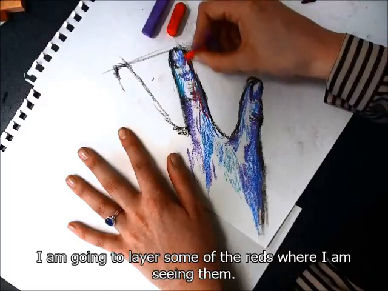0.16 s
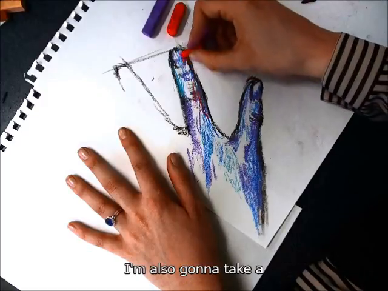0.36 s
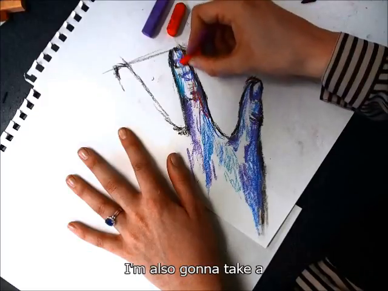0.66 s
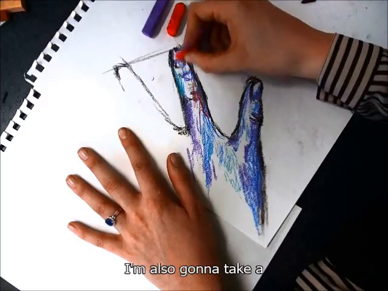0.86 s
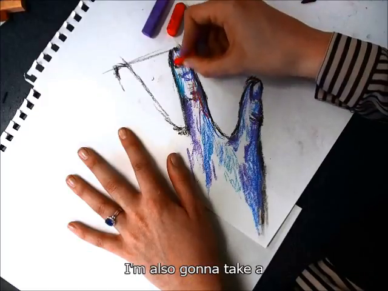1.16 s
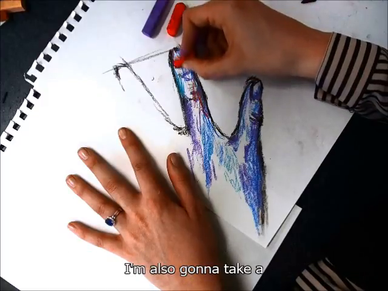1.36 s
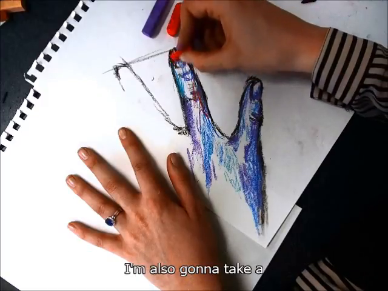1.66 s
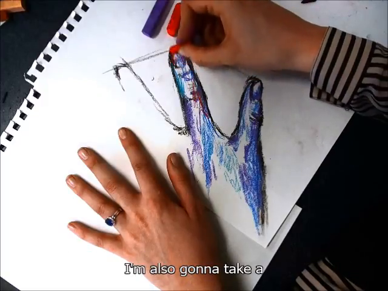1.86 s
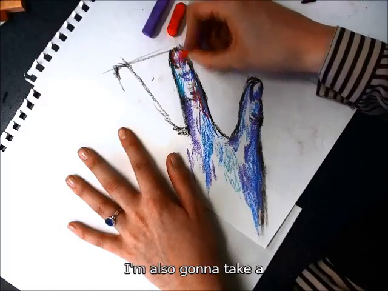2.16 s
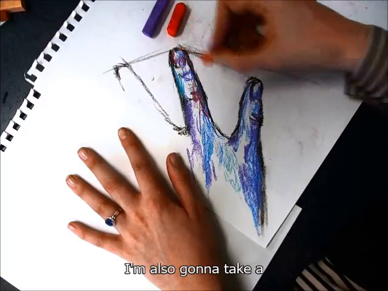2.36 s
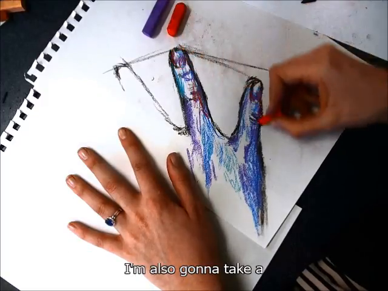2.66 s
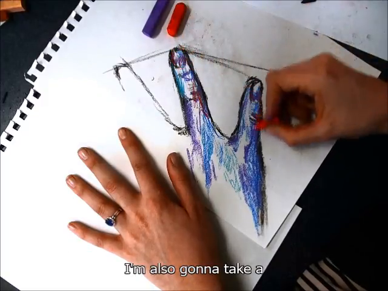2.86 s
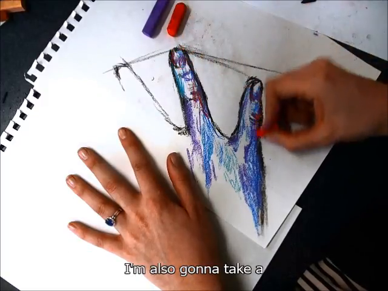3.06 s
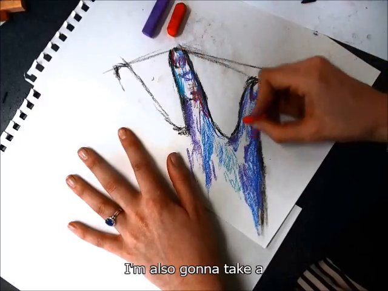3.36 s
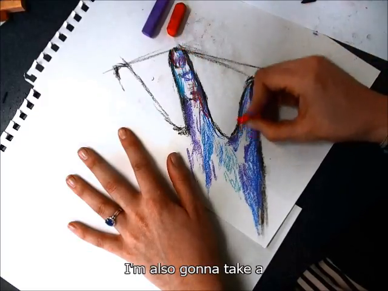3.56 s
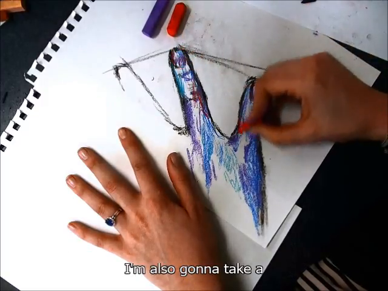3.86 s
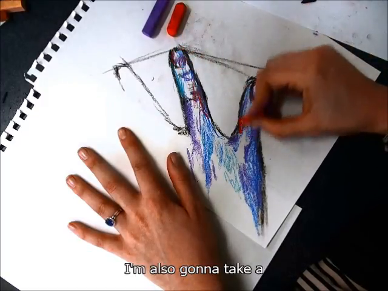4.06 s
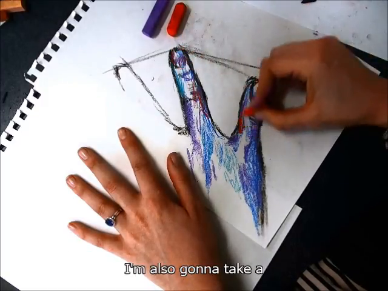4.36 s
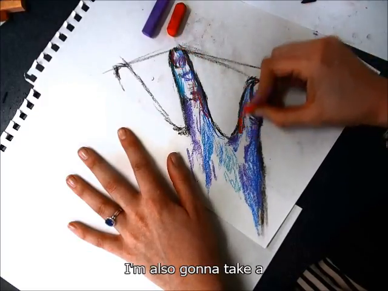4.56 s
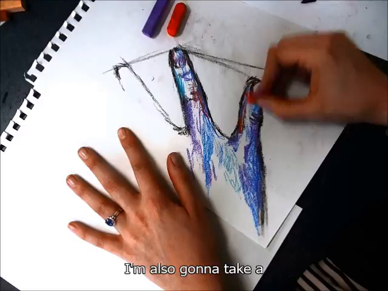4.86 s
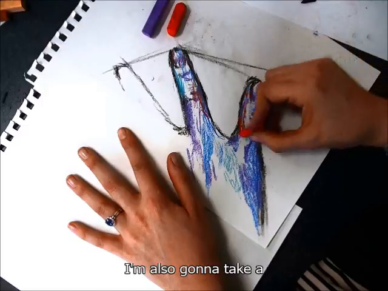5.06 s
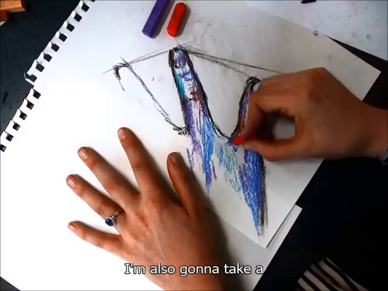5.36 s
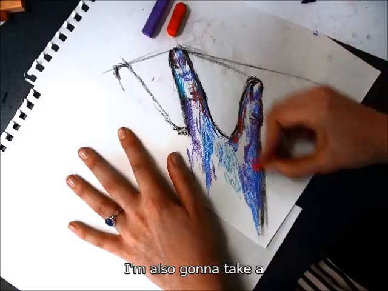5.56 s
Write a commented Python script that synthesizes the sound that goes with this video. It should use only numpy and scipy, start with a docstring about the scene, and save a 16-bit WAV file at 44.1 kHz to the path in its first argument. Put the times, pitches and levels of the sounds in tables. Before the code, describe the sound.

A quiet, dry room carries a faint rush of air and a wavering computer-fan hum throughout, with a barely audible low wobble from the rocking microphone stand. A soft bump comes at 0.1 s, and a pastel stick shades paper in short, thin, powdery scratches, roughly five or six a second, until 2.2 s, with a few tiny snaps and muffled taps near 1.9 and 2.1 s. A brisker, louder flick at 2.3 s is followed by a pause. From 3.0 s the stick scrapes and drags, crumbling in sparse crackle and sharp little snaps; a deep soft hand bump lands at 3.5 s and crisp table taps at 3.7 and 3.9 s. Fast strokes, about ten a second, with duller, grainier crackle run to about 5.1 s. A faint slow drag follows, then from 5.4 s stronger drags, snaps and low bumps to the end at about 5.7 s. Close microphone, narrow treble.

```python
"""A computer fan hums in a quiet room and the microphone sways on its stand, from start to end.
A pastel stick shades a first patch in short strokes: filtered noise that swells and fades with each stroke.
Then it drags and crumbles in sparse crackle and short snaps, while taps ring the table and the hand bumps it.
It shades a second patch, duller crackle under the strokes, and ends with more drags, snaps and soft bumps."""
import sys
import numpy as np
from scipy import signal
from scipy.fft import rfft, irfft
from scipy.io import wavfile

SR = 44100
rng = np.random.default_rng(int(sys.argv[2]) if len(sys.argv) > 2 else 0)


def dump_mix(stems):
    """Bounce the given channels to the path in sys.argv[1] as a 16-bit WAV at rate SR."""
    frames = np.atleast_2d(stems).T  # one column per channel
    limited = np.clip(frames, -1, 1)  # hard clip at full scale
    pcm = np.round(limited * 32767).astype(np.int16)
    wavfile.write(sys.argv[1], SR, pcm)


N = 252428
TIME = np.arange(N) / SR  # s

# shading strokes of the stick: start t/s, length t/s, level at the fastest moment/dB
STROKES = [(0.13, 0.11, -62.5), (.245, 0.052, -64.5), (0.478, .075, -62), (0.662, .072, -58),
           (0.842, .078, -56.5), (1.015, .075, -62), (1.198, 0.06, -63.5), (1.35, .08, -61),
           (1.535, 0.066, -58.5), (1.70, 0.086, -58.5), (1.92, .08, -60), (2.095, 0.082, -63.5),
           (2.2, .1, -64), (2.285, 0.057, -51.5), (3.088, .095, -57.5), (3.29, 0.054, -56.5),
           (3.68, 0.092, -58), (3.795, 0.06, -61), (3.878, 0.08, -56.5), (3.968, 0.083, -58),
           (4.057, .086, -56.5), (4.156, 0.084, -57), (4.243, 0.087, -54), (4.354, .07, -56.5),
           (4.433, 0.068, -53.5), (4.56, 0.031, -57), (4.605, 0.059, -53.5), (4.712, 0.039, -56),
           (4.768, 0.068, -55.5), (4.915, 0.044, -56), (5.042, .045, -58)]
# slow drags between the runs of shading: start t/s, length t/s, level at the fastest moment/dB
DRAGS = [(-.2, 0.5, -67.5), (3.17, 0.14, -57.5), (3.328, 0.039, -54), (3.372, .036, -53.5),
         (3.47, 0.075, -57), (3.59, 0.16, -60.5), (5.09, .26, -67), (5.36, .1, -54.5),
         (5.497, 0.069, -51.5), (5.69, .06, -52)]


def gain_of(db):
    """Turns decibels into amplitude."""
    return 10 ** (np.asarray(db) / 20)


def evened(x):
    """Scales a sound to an average strength (rms) of 1."""
    return x / np.sqrt(np.mean(x ** 2) + 1e-20)


def level(curve):
    """Amplitude over time, drawn through rows of t/s, level/dB."""
    return gain_of(np.interp(TIME, *np.transpose(curve)))


def add(mix, s, sound):
    """Mixes a sound in at s seconds, or at the very start if s is negative."""
    part = mix[max(round(s * SR), 0):][:len(sound)]
    part += sound[:len(part)]


def coloured(x, points):
    """Filters a sound by a spectrum with rows of f/Hz, level/dB, then evens it to rms 1."""
    hz, db = np.transpose(points)
    f = np.fft.rfftfreq(N, 1 / SR)
    shape = gain_of(np.interp(np.log(f + 1), np.log(hz), db))
    low_fade = np.minimum(f / hz[0], 1)  # fades out below the lowest point
    return evened(irfft(rfft(x) * shape * low_fade, N))


def drift(rate):
    """Smooth random wandering, changing up to about rate times a second; rms 1."""
    f = np.fft.rfftfreq(N, 1 / SR)
    keep_slow = np.exp(-(f / rate) ** 2) * (f > 0)
    return evened(irfft(rfft(rng.standard_normal(N)) * keep_slow, N))


def glides(rows, fullness):
    """Level of hand movements that each speed up and slow down in the same arch."""
    fastest_at = 0.53  # share of the movement
    out = np.zeros(N)
    for start, length, db in rows:
        progress = np.interp((TIME - start) / length, [0, fastest_at, 1], [0, .5, 1])
        out += gain_of(db) * abs(np.sin(np.pi * progress)) ** fullness
    return out


def air():
    """The steady rush of the fan and rumble of the room are noise with one fixed colour."""
    # spectrum of the room: f/Hz, level per Hz/dB
    room_colour = [(15, 26), (30, 18), (48, 11.5), (85, 10), (130, 3.5), (330, 0.5), (420, -1), (700, 1),
                   (850, -3.5), (1150, -2.5), (1600, -9.5), (2800, -12), (4500, -14), (7600, -18)]
    room_db = -51.5
    return gain_of(room_db) * coloured(rng.standard_normal(N), room_colour)


def hum(swelling_hz=740, swelling_width_hz=30):
    """Close fan tones beat against each other over a weak mains hum; the fan speed wanders a little."""
    # mains hum: f/Hz, level/dB
    mains = (60, -64)
    # fan tones: f/Hz, level before the swell/dB
    fan_tones = [(207.3, -74), (359.3, -77.5), (530.3, -68.5), (585.4, -77.5), (608.3, -74), (612.4, -76.5),
                 (675.6, -82), (705.2, -71.5), (716.7, -75.5), (727.4, -63.5), (750.3, -69), (757.7, -67),
                 (818.3, -84), (847.2, -77), (944.1, -77.5), (1049.7, -78), (1063.2, -70), (1067.9, -76.5),
                 (1086.1, -72.5), (1090.8, -73.5), (1181.6, -86), (1272.5, -79), (1341.1, -79.5),
                 (2279.8, -87), (2399.6, -85.5), (2447.4, -79.5), (2495.8, -87), (2506.6, -85),
                 (2518.7, -89), (2545.0, -89.5), (3115.6, -82), (3234.7, -87)]
    # swell of the tones near swelling_hz: t/s, level change/dB
    fan_swell = [(0, -2), (.4, -6), (.9, 2), (1.8, -3.5), (2.5, 0), (4.9, 0.5), (5.72, -3)]
    mains_hz, mains_db = mains
    out = gain_of(mains_db) * evened(np.sin(2 * np.pi * mains_hz * TIME))
    speed = 1 + .0005 * drift(rate=1.5)
    turns_per_hz = np.cumsum(speed) / SR
    for hz, db in fan_tones:
        share = np.exp(-((hz - swelling_hz) / swelling_width_hz) ** 4)  # how much this tone swells
        tone = evened(np.sin(2 * np.pi * (hz * turns_per_hz + rng.random())))
        out += gain_of(db) * level(fan_swell) ** share * tone
    return out


def sway(rate_hz=11.6, wander=0.075):
    """The drawing arm keeps the microphone stand rocking: a very low tone whose rate wanders."""
    # rocking of the stand: t/s, level/dB
    sway_level = [(0.0, -48), (0.16, -39.5), (0.35, -48.5), (1.1, -37), (1.86, -46.5), (2.82, -31.5),
                  (3.41, -51.5), (3.51, -29.5), (3.73, -50.5), (4.17, -39.5), (4.54, -60.5), (4.68, -41),
                  (5.69, -39), (5.72, -33)]
    turns = np.cumsum(rate_hz * (1 + wander * drift(rate=4))) / SR
    return level(sway_level) * evened(np.sin(2 * np.pi * turns))


def bumps(rise_s=0.0065, settle_s=0.025):
    """The soft edge of the hand shoves the table: a low swing that slows and dies as the hand settles."""
    # soft blows: t/s, level before the rise and decay/dB, starting f/Hz, time to fall 60 dB t/s
    blows = [(0.059, -39, 108, 0.14), (0.108, -30, 48, 0.063), (1.896, -34, 142, 0.079),
             (2.132, -34, 88, 0.074), (3.488, -37, 80, .03), (3.4976, -17, 46, 0.21),
             (3.601, -37.5, 63, 0.1), (5.488, -29, 44.6, 0.64), (5.559, -33.5, 49, 0.32),
             (5.63, -25, 30, 0.34)]
    out, t = np.zeros(N), TIME[:SR // 2]
    for s, db, hz, t60 in blows:
        turns = hz * settle_s * np.log1p(t / settle_s)  # the pitch sinks from hz
        rise = 1 - np.exp(-(t / rise_s) ** 2)
        add(out, s, gain_of(db - 60 * t / t60) * np.sin(2 * np.pi * turns) * rise)
    return out


def hand():
    """The heel of the hand rumbles on the table as low noise, most when it slides."""
    # slides of the hand: start t/s, length t/s, level at the fastest moment/dB
    hand_slides = [(-.4, 1.05, -60), (3.38, .3, -50.5), (5.36, .48, -54)]
    # spectrum of the rumble: f/Hz, level per Hz/dB
    hand_colour = [(25, 7), (45, -6.5), (95, -5), (140, -7), (210, -15.5), (400, -17.5), (2000, -60)]
    rest_db = -69
    loudness = np.hypot(gain_of(rest_db), glides(hand_slides, 1))
    return loudness * coloured(rng.standard_normal(N), hand_colour)


def taps():
    """The stick lands on the table through the sheet: a short, rounded push, then the table top rings."""
    # landings: t/s, peak level of the push/dB, contact time t/s
    landings = [(1.868, -41, 0.0028), (1.888, -42, 0.0012), (2.122, -39, 0.0018), (3.354, -34.5, 0.00087),
                (3.735, -29.5, 0.00039), (3.741, -42, 0.0056), (3.7462, -33, 0.00094),
                (3.9339, -30, 0.00077)]
    # ringing modes of the table top: f/Hz, level relative to the push/dB, time to fall 60 dB t/s
    table_modes = [(267, -28.5, 0.041), (337, -13, 0.068), (616, -18, .02), (1200, -18.5, .016),
                   (1620, -9.5, 0.012), (4300, -30, .005)]
    out, t = np.zeros(N), TIME[:SR // 8]
    ring = sum(gain_of(db - 60 * t / t60) * np.sin(2 * np.pi * hz * t) for hz, db, t60 in table_modes)
    for s, db, contact in landings:
        u = 2 * np.pi * t / contact
        force = (u * np.exp(1 - u)) ** 2
        ringing = signal.fftconvolve(force / force.sum(), ring)[:len(t)]
        add(out, s, -gain_of(db) * (force + ringing))
    return out


def crumbs(spread_octaves=0.33):
    """Small crumbs break off by chance, more often the harder the stick drags; rows as in large_crumbs."""
    most_per_s = 60  # at the hardest drag
    middle_db, spread_db, middle_hz = -47, -1.5, 3450  # level before the gain in ticks
    effort = glides(DRAGS, 1)
    chance, size, pitch = rng.random(N), rng.standard_normal(N), rng.standard_normal(N)
    at = np.flatnonzero(chance < most_per_s / SR * effort / effort.max())
    levels_db = middle_db + spread_db * size[at]
    rings_hz = middle_hz * 2 ** (spread_octaves * pitch[at])
    return list(zip(TIME[at], levels_db, rings_hz))


def ticks(gain_db=4.5, cycles=0.48, rustle_db=-22, rustle_s=0.0039):
    """A crumb gives way with a snap of very few cycles and the sheet rustles briefly around it."""
    # largest crumbs of pigment to snap under the tip: t/s, level before gain_db/dB, ring f/Hz
    large_crumbs = [(0.407, -45, 5440), (0.4319, -46, 5540), (1.308, -47, 6050), (1.3649, -44, 5050),
                    (3.0319, -44.5, 2200), (3.2147, -39, 3700), (3.2807, -46, 2700), (3.3466, -42.5, 2220),
                    (3.3946, -41.5, 3000), (3.4918, -44, 5200), (3.5027, -34, 4750), (3.5157, -45.5, 4200),
                    (3.54, -41.5, 4600), (3.601, -41.5, 4230), (3.6503, -46, 5300), (5.4163, -39, 4480),
                    (5.4561, -43.5, 4300), (5.4767, -44.5, 5200), (5.5624, -42.5, 4800),
                    (5.6858, -36, 4670)]
    out, lead = np.zeros(N), SR // 100
    t = TIME[:4 * lead] - TIME[lead]  # starts 10 ms ahead of the middle of the snap
    for s, db, hz in large_crumbs + crumbs():
        snap = np.sin(2 * np.pi * hz * t) * np.exp(-abs(hz * t / cycles) ** 1.37)
        below_ring = np.sinc(hz * t) * np.cos(np.pi * hz * t)  # passes noise up to the ring pitch
        rustle = evened(signal.fftconvolve(rng.standard_normal(len(t)), below_ring, "same"))
        fade = np.exp(-np.maximum(t, -2 * t) / rustle_s)  # grows twice as fast as it dies
        add(out, s + t[0], gain_of(db + gain_db) * (snap + gain_of(rustle_db) * rustle * fade))
    return out


def tooth(per_s, spread_db, dust):
    """Tiny slips over the paper's fibres, of uneven size, on a bed of powdery friction noise."""
    happens = rng.random(N) < per_s / SR
    direction = rng.choice([-1, 1], N)
    size = gain_of(spread_db * np.minimum(rng.exponential(1, N), 4))
    return evened(evened(happens * direction * size) + dust * rng.standard_normal(N))


def drag(fullness=0.63, clump_db=2):
    """At low speed the slips come apart into a duller crackle, which never quite stops."""
    # spectrum of the crackle: f/Hz, level per Hz/dB
    drag_colour = [(120, 2), (350, 4), (900, -1), (1600, 3), (2400, -9), (4500, -7.5), (6000, -6.5),
                   (7800, -11)]
    # faint crackle of the resting tip: level in the first patch/dB, level in the second patch/dB
    resting_db = (-75.5, -67.5)
    second_patch_s, under_stroke_db = 3.05, -10.5  # start; crackle relative to its stroke
    friction = tooth(per_s=1100, spread_db=5.5, dust=0.36) * gain_of(clump_db * drift(rate=25))
    second = TIME > second_patch_s
    resting = gain_of(np.where(second, resting_db[1], resting_db[0]))
    shading = gain_of(under_stroke_db) * glides(STROKES, fullness) * second
    loudness = np.sqrt(glides(DRAGS, fullness) ** 2 + resting ** 2 + shading ** 2)
    return loudness * coloured(friction, drag_colour)


def strokes(fullness=0.91, chatter_db=1.9):
    """Each stroke speeds up and slows again; the friction follows its speed and rings in the gripped stick."""
    # scratch in the first way the stick is held: f/Hz, level per Hz/dB
    first_grip = [(400, -16.5), (1500, -12), (3000, -8.5), (3600, -14.5), (4200, 0.5), (4700, 3),
                  (5150, -5), (5900, -4), (6550, 0.5), (7100, 4.5), (7800, -14)]
    # scratch in the second way the stick is held: f/Hz, level per Hz/dB
    second_grip = [(400, -6), (1600, -7), (2600, -10), (3500, -10), (4000, -1), (4350, -4.5), (4720, 3.5),
                   (5150, -6), (5700, -1), (6400, -6), (7000, 0.5), (7700, -11.5)]
    grip_change_s = 2.7
    friction = tooth(per_s=3500, spread_db=3.0, dust=0.7) * gain_of(chatter_db * drift(rate=67))
    first, second = coloured(friction, first_grip), coloured(friction, second_grip)
    return glides(STROKES, fullness) * np.where(TIME < grip_change_s, first, second)


def reflections(x, t60=0.027, wet_db=-13):
    """Desk and walls add a faint, short tail: noise that falls 60 dB in t60 seconds."""
    t = TIME[:SR // 3]
    tail = rng.standard_normal(len(t)) * gain_of(-60 * t / t60) * (t > .003)  # first echo after 3 ms
    return gain_of(wet_db) * signal.fftconvolve(x, tail / np.linalg.norm(tail))[:N]


def scene():
    """The drawing close by with its reflections, the room behind it."""
    background = air() + hum() + sway() + bumps()
    drawing = hand() + taps() + ticks() + drag() + strokes()
    return (drawing + reflections(drawing) + background)[None]


def record(dry):
    """A narrow-band microphone removes the highest treble."""
    edge_hz = 7950
    low_pass = signal.firwin(221, edge_hz, window=("kaiser", 8), fs=SR)
    return signal.oaconvolve(dry, low_pass[None], "same")


dry = scene()
out = record(dry)
dump_mix(out)
```